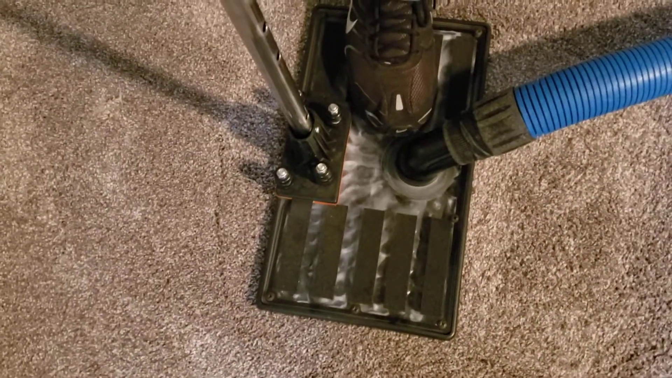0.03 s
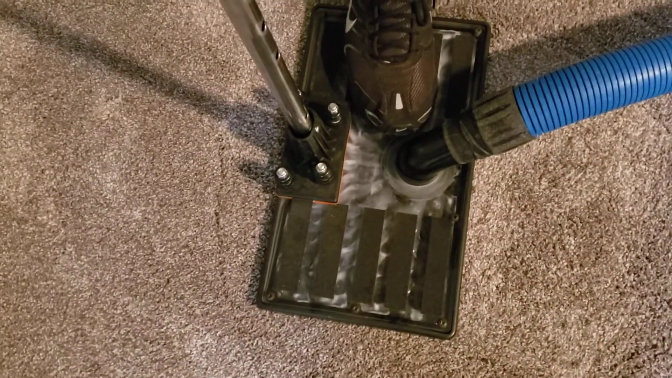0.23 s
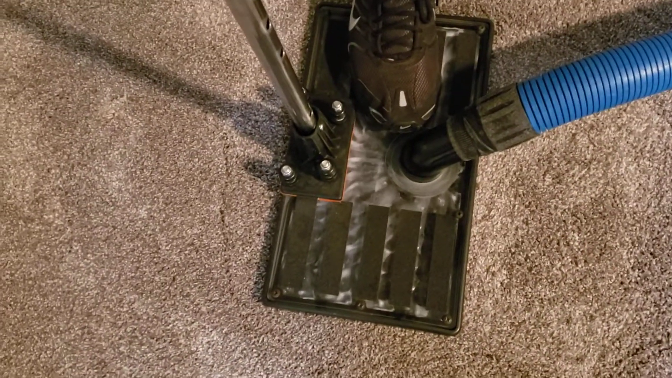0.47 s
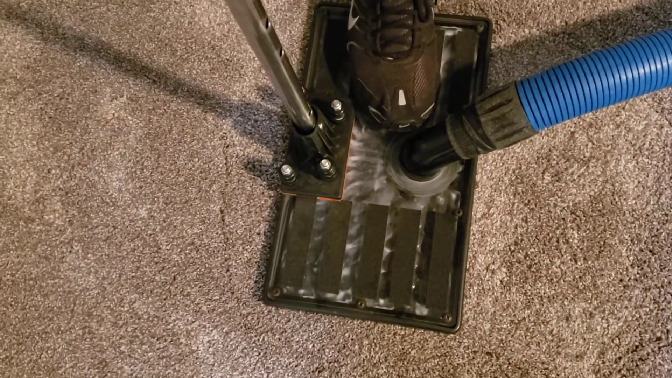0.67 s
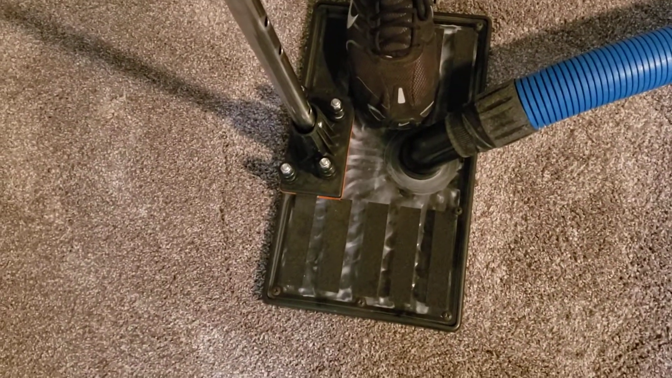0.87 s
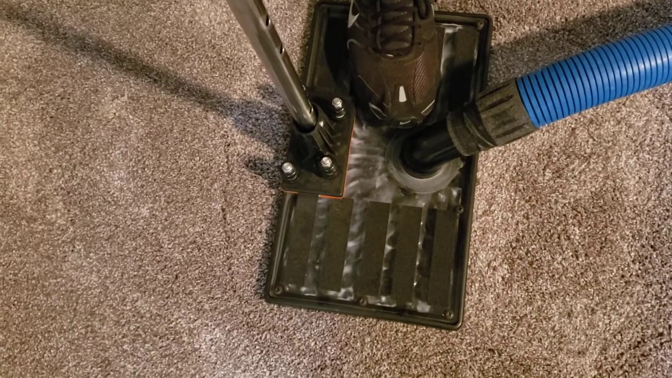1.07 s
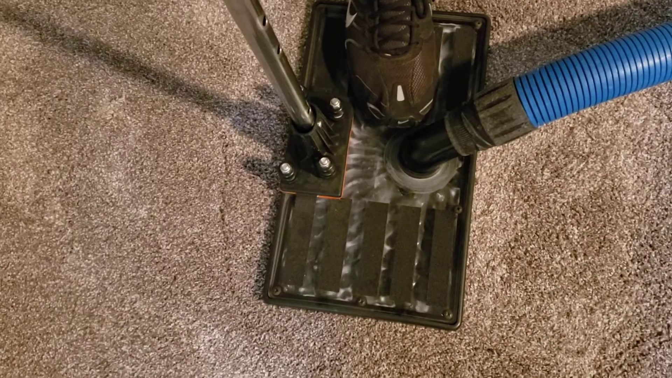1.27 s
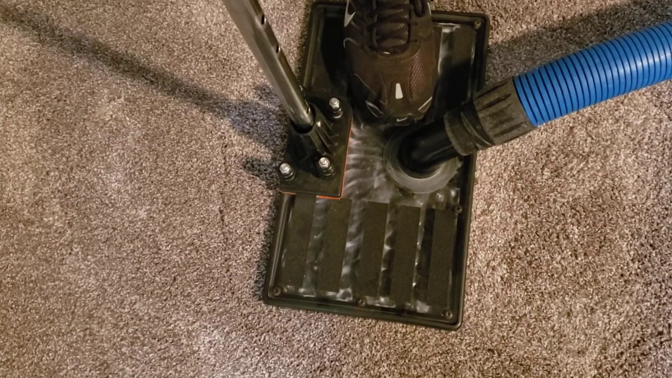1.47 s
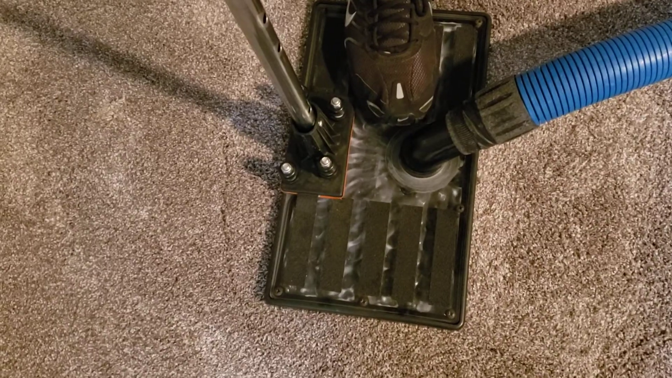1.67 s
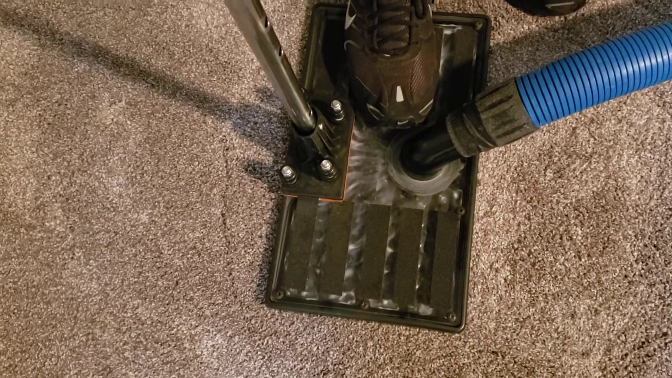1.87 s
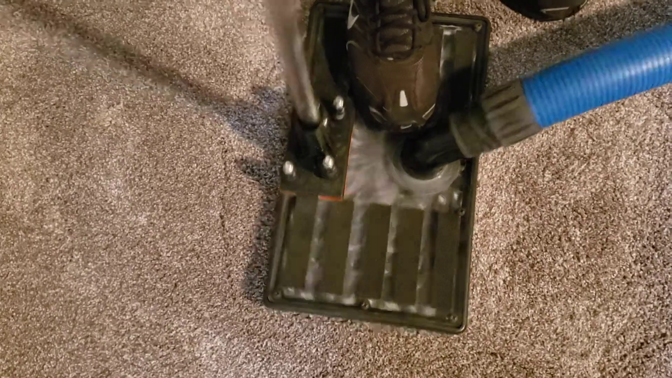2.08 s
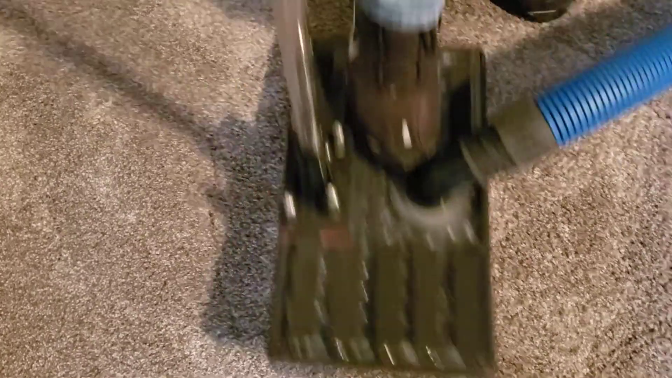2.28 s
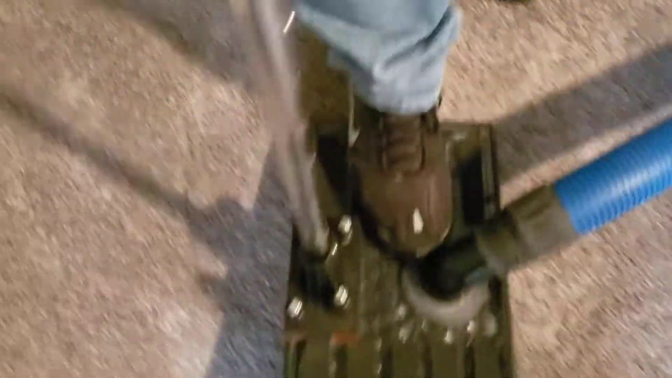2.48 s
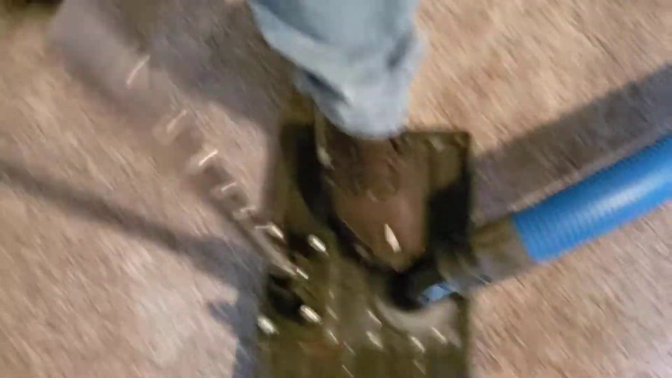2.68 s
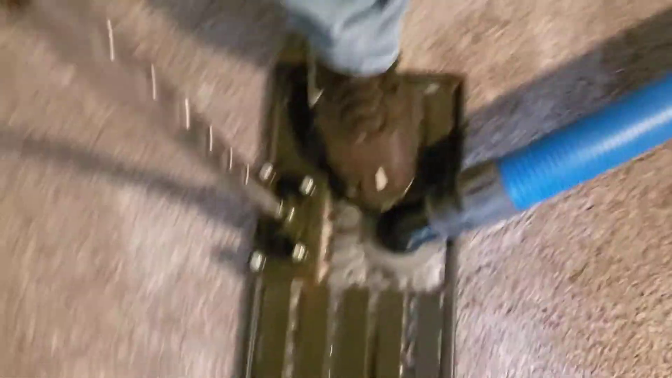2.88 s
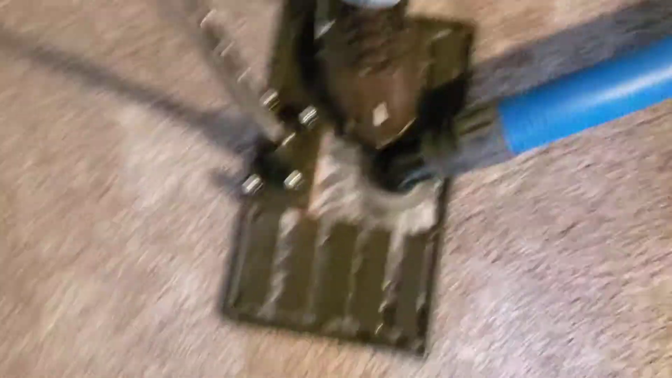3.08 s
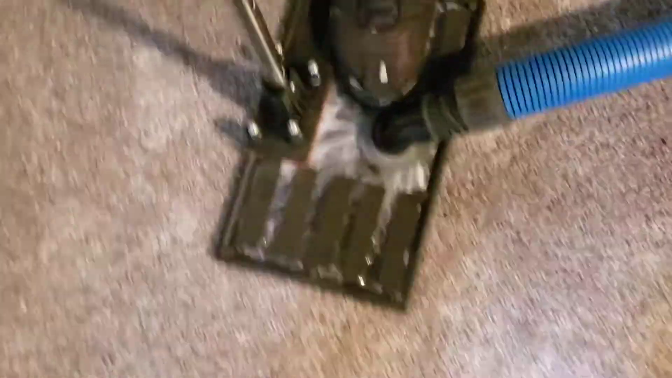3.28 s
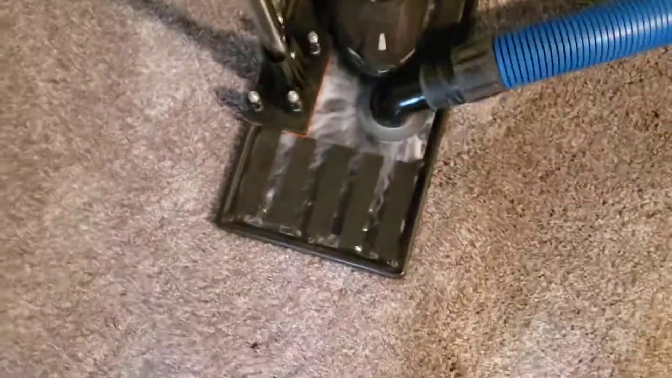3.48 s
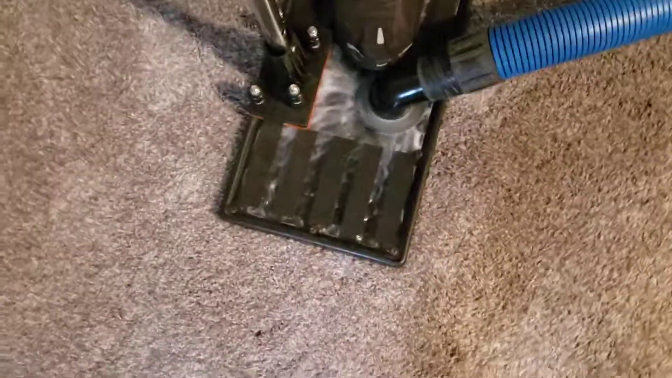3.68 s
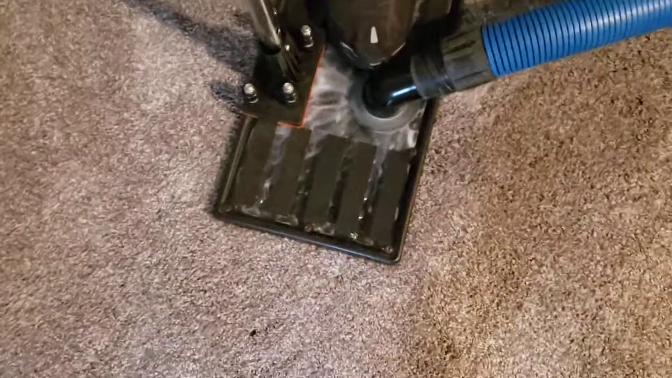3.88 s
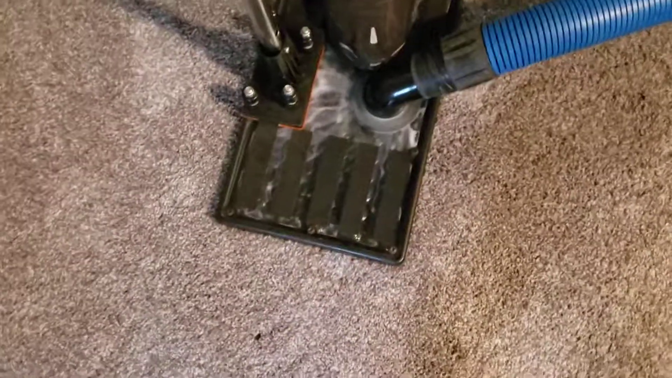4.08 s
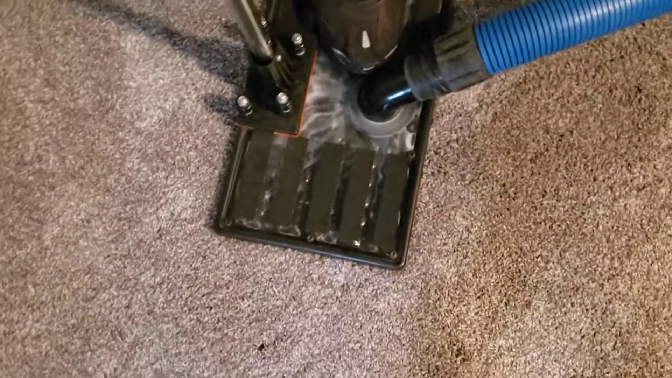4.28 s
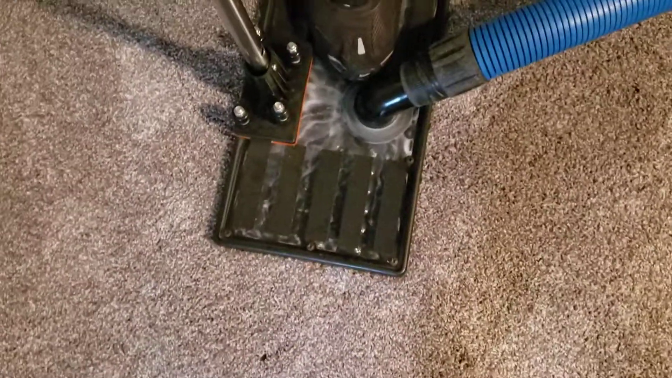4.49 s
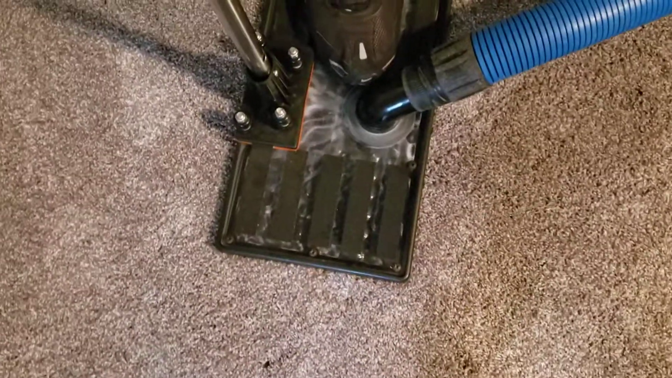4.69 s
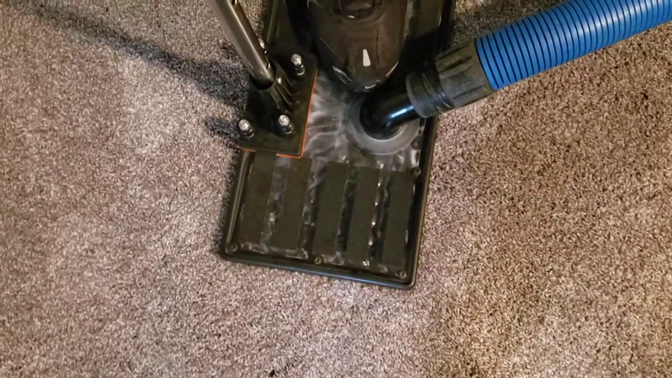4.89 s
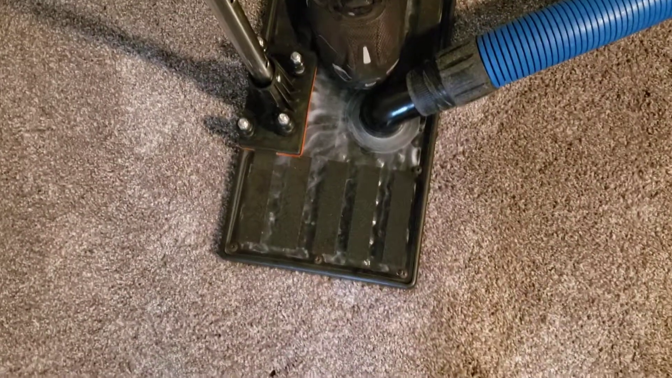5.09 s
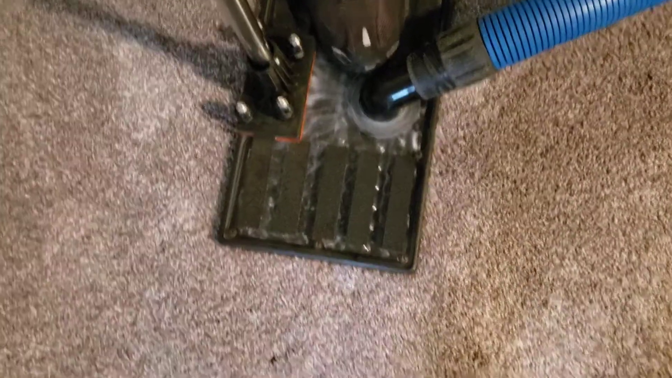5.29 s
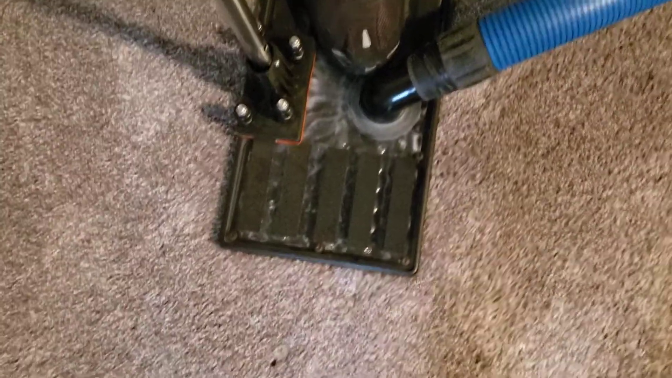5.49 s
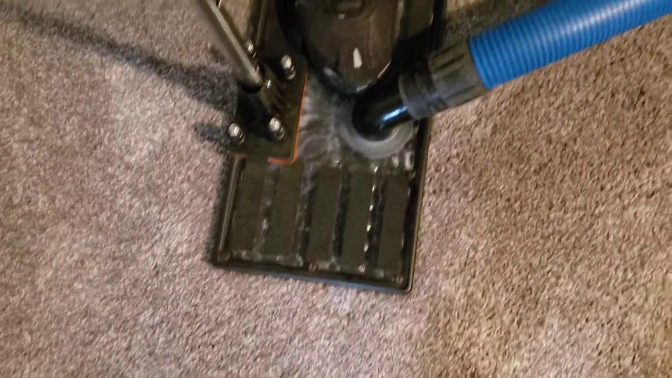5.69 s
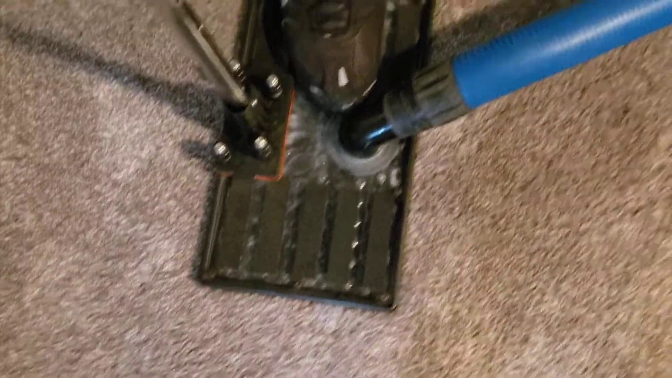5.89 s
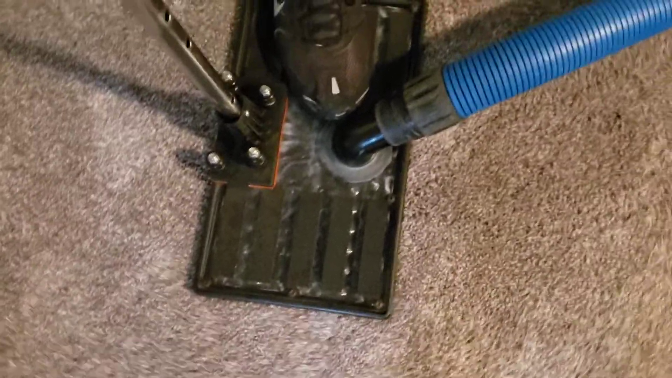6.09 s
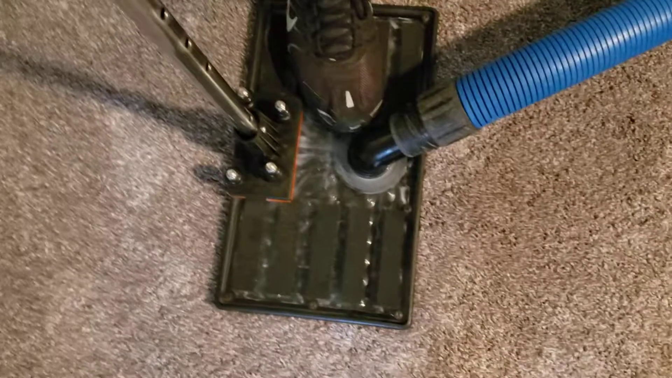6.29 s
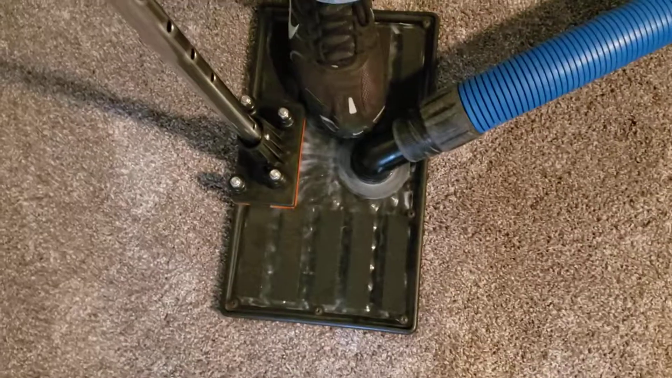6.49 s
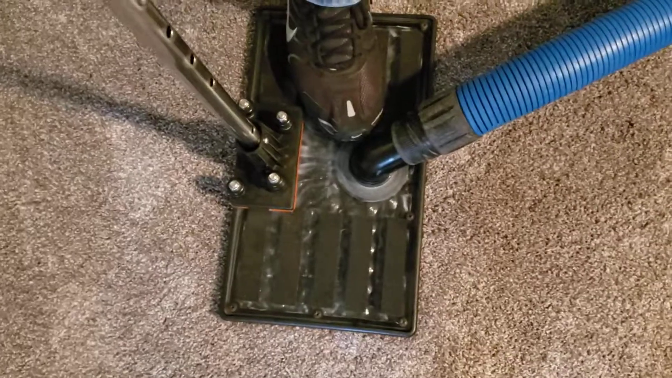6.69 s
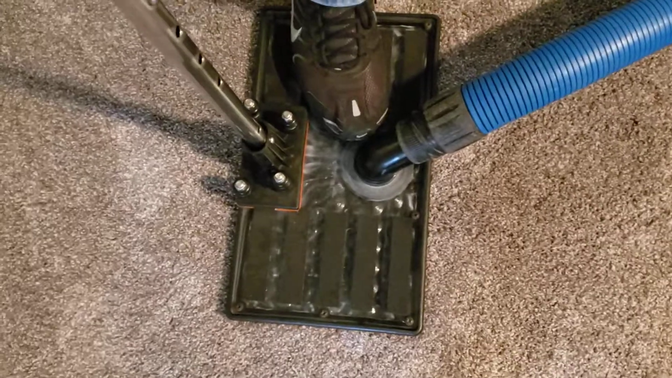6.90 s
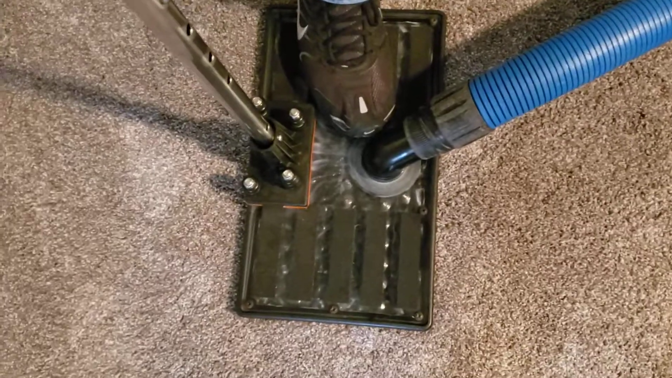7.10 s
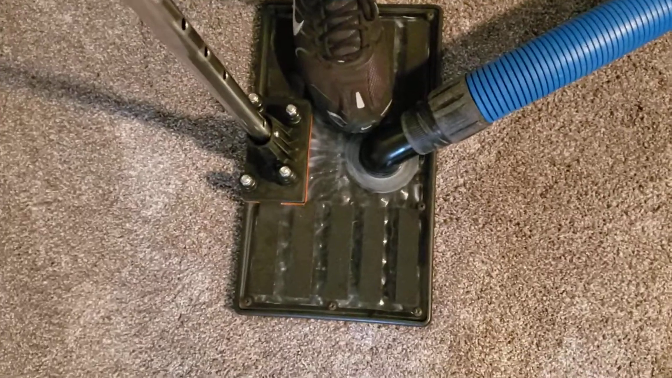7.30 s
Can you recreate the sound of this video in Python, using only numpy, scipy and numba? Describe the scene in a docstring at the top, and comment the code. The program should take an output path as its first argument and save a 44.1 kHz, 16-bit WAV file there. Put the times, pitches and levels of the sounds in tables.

```python
"""A flat suction plate pulls water out of a carpet while its vacuum machine hums further off in the house.
Air hisses and spits through the wet pile under the rim, and water gurgles up the hose. At two seconds a
foot shoves the plate forward: it scrubs over the pile, thumps the floor and squirts water through the gap.
The hiss falls back, then builds again as the plate seals; slugs of water briefly choke it near six seconds."""
import sys
import numpy as np
from scipy import signal
from scipy.fft import rfft, irfft
from scipy.io import wavfile
from numba import njit

SR = 44100
rng = np.random.default_rng(int(sys.argv[2]) if len(sys.argv) > 2 else 0)


def unload_audio(sound):
    """Save the sound as a 16-bit wav file, at the path given as the first command line argument."""
    columns = np.transpose(np.atleast_2d(sound))
    # keep every value between -1 and 1, then stretch to whole-number steps
    steps = np.round(np.clip(columns, -1, 1) * 32767)
    wavfile.write(sys.argv[1], SR, steps.astype(np.int16))


N = 323694
TIME = np.arange(N) / SR
BIN_HZ = np.maximum(np.arange(N // 2 + 1) * SR / N, 1)

# How strongly air is drawn through the carpet: time_s, level_db
SUCTION = [(0.0, -41), (0.43, -37), (2.11, -36.5), (2.15, -30.5), (2.17, -35), (2.62, -34.5), (2.82, -42.5),
           (3.9, -45), (5.01, -40), (5.68, -35.5), (6.01, -36.5), (7.34, -36.5)]
# Tone colour of the hiss in the pile before, during and after the shove: pitch_hz, relative_db
PILE_BEFORE = [(180, -51), (300, -21), (444, -23), (516, -7.5), (741, -26.5), (836, -14.5), (1060, -27),
               (1670, -8), (1860, -15), (2000, -11.5), (2670, -7.5), (3060, -9), (3610, -5.5), (8510, -5),
               (11000, -4), (14300, -32), (22000, -120)]
PILE_SLIDING = [(300, -23), (1000, -44), (2000, -8.5), (3000, -8), (3600, -3), (4600, -2.5), (6000, -2.5),
                (7100, 3), (8400, 4.5), (9500, 4.5), (11000, -16), (14300, -24)]
PILE_AFTER = [(180, -54), (300, -17), (418, -14.5), (486, -27.5), (540, -11.5), (667, -23.5), (823, -12.5),
              (1080, -27), (1260, -18), (1890, -12), (2060, -13), (4320, -4.5), (7320, -3.5), (8140, -5.5),
              (11000, -4.5), (14300, -41), (22000, -120)]
# Notes that the air sounds in the hose: start_s, end_s, pitch_hz, width_hz, relative_db
HOSE_WHISTLES = [(0, 1.4, 3920, 500, -12), (1.7, 1.97, 4520, 400, -8), (2.35, 3.1, 3880, 450, -7.5),
                 (3.15, 7.34, 1900, 95, -18.5), (5.5, 7.34, 4830, 450, -14.5)]
# Tone colour of the air jets at the rim before, during and after the shove: pitch_hz, relative_db
JETS_BEFORE = [(7000, -28.5), (9000, -11), (10400, -5), (11000, -3), (11650, 3), (12500, 0.5), (14300, -2),
               (14900, -6), (15800, -11.5)]
JETS_SLIDING = [(7000, -29.5), (9000, -17), (9800, -1), (11300, 1), (12200, -1.5), (13300, -3),
                (14300, -11), (15800, -4)]
JETS_AFTER = [(7000, -32), (9000, -9), (10400, -4.5), (11000, -1.5), (11650, 3), (13200, 0.5), (14300, 0),
              (14900, -5), (15800, -5.5)]
# Tone colour of water sputtering in the hose: pitch_hz, relative_db
GURGLE_COLOUR = [(300, -14), (420, 2.5), (540, -3), (720, 0), (880, 0), (1150, -5), (1700, 2.5), (2600, -5),
                 (4000, -14)]
# The blower's note, which shows the machine's speed: time_s, pitch_hz
BLOWER_PITCH = [(0.0, 265), (0.12, 264.8), (2.37, 266.0), (2.45, 269.7), (3.29, 270.1), (3.95, 263.2),
                (7.34, 266.6)]
# How loud that note is: time_s, relative_db
BLOWER_LEVEL = [(0.0, -69), (0.61, -54.5), (0.94, -67), (1.14, -56.5), (1.53, -70), (1.71, -52.5),
                (3.11, -61), (4.07, -70), (4.52, -57), (4.68, -64.5), (6.19, -53), (6.64, -59), (6.75, -54),
                (7.34, -60.5)]
# Hum at 1, 2 and 3 times the motor's turning rate:
# sealed_level_db, db_per_suction_db, sliding_change_db, waver_db, left_minus_right_db
MOTOR_TONES = [(-49.5, 1.45, -13, 1.0, 3), (-56, 1.1, 0, 2, 3), (-52.5, 1.3, -1.5, 1.0, 3)]
# Tone colour of the rumbling hose: pitch_hz, relative_db
RUMBLE_COLOUR = [(20, -30), (30, -19), (39, -2), (52, -10), (68, -9), (78, 0), (100, -7), (126, 2.5),
                 (160, -12.5), (215, -3), (280, -13.5), (340, -11.5), (520, -24.5)]
# Tone colour of the plate rubbing on the pile: pitch_hz, relative_db
RUBBING_COLOUR = [(60, -25), (130, 0), (300, -3.5), (800, -1.5), (1250, 0.5), (1800, -7.5), (3000, -10),
                  (6000, -21)]
# The plate jerks loose and settles; weight on it boosts the lowest floor note: time_s, force_db, weight_db
JERKS = [(2.064, -32, -6), (2.13, -40, 0), (2.207, -39, 0), (2.781, -36, 4), (2.843, -44, 9)]
# Notes of the padded floor: pitch_hz, relative_db, ring_s (time to fade by 60 dB)
FLOOR_NOTES = [(43, -9, .28), (79, 4.5, 0.11), (128, 1.5, 0.079), (209, -1, 0.074)]
# Tone colour of the puff of air under a thump: pitch_hz, relative_db
PUFF_COLOUR = [(30, -20), (100, 9), (200, -20), (650, -6.5), (2000, -31)]
# Water squirts through the gap, each at its peak: time_s, level_db, pitch_hz, glide_hz_per_s
SQUIRTS = [(2.16, -23, 13200, -4000), (2.205, -13.5, 11720, -5000), (2.61, -29, 9600, -2000),
           (2.81, -21.5, 11400, 4000), (2.853, -21, 13200, 8000)]
# Slugs of water block the flow: time_s, depth_db
CHOKES = [(5.8, 9), (5.96, 5), (6.055, 10)]
# How alike the two sides sound: pitch_hz, likeness (0 is unrelated, higher is more alike)
STEREO_LIKENESS = [(60, 1.5), (140, .95), (290, 0.8), (480, 0.75), (800, 0.6), (1150, -0.15), (1600, 0.5),
                   (2200, .55), (3100, 0), (4200, 0.27), (4900, -0.1), (5600, 0.11), (12000, 0.07),
                   (15000, 0)]
# Which side is louder: pitch_hz, left_minus_right_db
STEREO_BALANCE = [(110, -0.5), (340, 0), (560, 2.5), (800, 0), (1700, 1.5), (2500, 0.5), (3550, -6),
                  (4600, 0), (8300, -3), (10700, 2), (13300, 1.5), (14500, 7), (15800, 1)]

PUSH_S, STOP_S = 2.14, 2.765   # the plate slides between these moments
SEALED_DB = -35   # suction with the plate well sealed


def from_db(db):
    """Turn decibels into a number to multiply a sound by."""
    return 10 ** (np.asarray(db) / 20)


def rms_one(x):
    """Scale a sound so that the average of its sides has a typical size (rms) of 1."""
    return x / np.sqrt(np.mean(np.atleast_2d(x).mean(axis=0) ** 2) + 1e-20)


def over_time(table):
    """Join a table's points with straight lines, giving a value for every sample."""
    return np.interp(TIME, *np.transpose(table))


def over_pitch(table):
    """Join a table's points along a scale of octaves, giving a value for every frequency."""
    hz, value = np.transpose(table)
    return np.interp(np.log(BIN_HZ), np.log(hz), value)


def held(start, end, rise_s, fall_s):
    """A volume shape that rises to 1 by start and falls away after end."""
    return np.clip(np.minimum((TIME - start) / rise_s, (end - TIME) / fall_s) + 1, 0, 1)


def bump(time_s, width_s):
    """A brief bell-shaped swell of height 1."""
    return np.exp(-((TIME - time_s) / width_s) ** 2)


def drift(rate_hz):
    """A smooth random wobble of typical size 1 that changes about rate_hz times a second."""
    return rms_one(irfft(rfft(rng.standard_normal(N)) / (1 + (BIN_HZ / rate_hz) ** 2), N))


def flutter(rate_hz, depth_db):
    """A randomly wavering volume that keeps the average power."""
    return rms_one(from_db(depth_db * drift(rate_hz)))


def panned(x, left_db):
    """Make the left side left_db louder than the right."""
    return x * from_db(np.array([[.5], [-.5]]) * left_db)


def noise(colour):
    """A stereo rushing sound, shaped by rows of pitch_hz, relative_db."""
    middle, side = rfft(rng.standard_normal((2, N)))
    alike = np.clip(over_pitch(STEREO_LIKENESS), -.6, .99)
    pair = middle + np.sqrt((1 - alike) / (1 + alike)) * side * [[1], [-1]]
    pair = panned(pair, over_pitch(STEREO_BALANCE))
    return rms_one(irfft(pair * from_db(over_pitch(colour)), N))


@njit
def resonate(x, hz, width_hz):
    """Make a sound ring around a pitch that can move, as it does in a hollow space."""
    y, decay = np.zeros_like(x), np.exp(-np.pi * width_hz / SR)
    for side in range(2):
        ring = 0j
        for i in range(N):
            ring = ring * decay * np.exp(2j * np.pi * hz[i] / SR) + x[side, i]
            y[side, i] = ring.real
    return y * np.sqrt(2 * (1 - decay * decay))


def pull_db():
    """How far the suction is above or below that of the well sealed plate."""
    return over_time(SUCTION) - SEALED_DB


def changing_hiss(before, sliding, after):
    """The hiss changes colour as the plate leaves one patch of carpet and settles on the next."""
    gone = np.clip(.5 + (TIME - PUSH_S) / 0.14, 0, 1)
    landed = np.clip(.5 + (TIME - STOP_S) / 0.1, 0, 1)
    return (np.sqrt(1 - gone) * noise(before)
            + np.sqrt(gone * (1 - landed)) * noise(sliding)
            + np.sqrt(landed) * noise(after))


def pile_hiss():
    """Air rushes through the wet pile and whistles in the hose; water slurps in the plate's throat."""
    hiss = from_db(4) * changing_hiss(PILE_BEFORE, PILE_SLIDING, PILE_AFTER)
    flow = noise([(800, -25), (1600, -6), (5200, -8), (8000, -22)])
    for start, end, hz, width_hz, whistle_db in HOSE_WHISTLES:
        whistle = rms_one(resonate(flow, np.full(N, float(hz)), float(width_hz)))
        hiss += from_db(whistle_db) * held(start, end, rise_s=.23, fall_s=.23) * whistle
    slurp_hz = 2890 * 2 ** (.35 * drift(rate_hz=4.2))   # wanders by about a third of an octave
    slurp = from_db(-16.5) * rms_one(resonate(flow, slurp_hz, width_hz=300.0))
    slurp *= flutter(rate_hz=7, depth_db=2)
    return from_db(over_time(SUCTION)) * (hiss + slurp) * flutter(rate_hz=125, depth_db=0.92)


def rim_jets():
    """Thin jets of air hiss very high at the rim; spitting droplets roughen them and the squirts."""
    sliding = held(PUSH_S, STOP_S, rise_s=.03, fall_s=.08)
    level_db = -23.5 + 1.03 * pull_db() + 2 * sliding
    jets = from_db(level_db) * changing_hiss(JETS_BEFORE, JETS_SLIDING, JETS_AFTER)
    spit = flutter(rate_hz=160, depth_db=0.2) * flutter(rate_hz=47, depth_db=0.82)
    return spit * (jets + squirts())


def echoes(x, echo_db, sway_s, count=8):
    """Short echoes bounce off tool, legs and walls; their delays shift as the listening point sways."""
    out, sway = x.copy(), drift(rate_hz=0.57)
    for late, lean, flip in rng.random((count, 3)):
        delay_s = .001 + .009 * late + sway_s * (2 * lean - 1) * sway
        for side in range(2):
            arrival_s = delay_s + rng.uniform(0, .0002)
            echo = np.interp(TIME - arrival_s, TIME, x[side], left=0)
            out[side] += np.sign(flip - .5) * from_db(echo_db) * echo
    return out / np.sqrt(1 + count * from_db(2 * echo_db))


def gurgle():
    """Water sputters up the hose in uneven slugs, harder when the suction is strong."""
    slugs = flutter(rate_hz=9, depth_db=3.2) * flutter(rate_hz=170, depth_db=4.2)
    return from_db(over_time(SUCTION) - 16) * slugs * noise(GURGLE_COLOUR)


def hum(hz, level_db, waver_db, left_db):
    """One pure note of the machine, wavering in strength."""
    wave = np.sqrt(2) * np.sin(2 * np.pi * (np.cumsum(hz) / SR + rng.random()))
    return panned(from_db(level_db) * wave * flutter(rate_hz=2.3, depth_db=waver_db), left_db)


def machine():
    """The blower sings, the motor hums and the hose rumbles; the last two grow with the suction."""
    blower_hz = over_time(BLOWER_PITCH)
    motor_hz = 62.86 * (blower_hz / 266) ** 0.68   # shares part of the blower's changes of speed
    pull = pull_db()
    sliding = held(PUSH_S + .1, STOP_S - .1, rise_s=.12, fall_s=.12)
    loss_db = np.interp(TIME, [PUSH_S, STOP_S], [0, 3])   # the two lowest hums weaken on the new patch
    out = hum(blower_hz, over_time(BLOWER_LEVEL) - 1, waver_db=0.9, left_db=-12)
    for multiple, (sealed_db, follows, sliding_db, waver_db, left_db) in enumerate(MOTOR_TONES, 1):
        level_db = sealed_db + follows * pull + sliding_db * sliding - loss_db * (multiple < 3)
        out += hum(multiple * motor_hz, level_db, waver_db, left_db)
    return out + from_db(-49 + 1.14 * pull) * noise(RUMBLE_COLOUR)


def scrub():
    """Tufts slip under the sliding rim and sound the hollow under the plate, whose pitch sinks."""
    sliding = held(PUSH_S, STOP_S, rise_s=.13, fall_s=.071) ** 1.5
    enclosed = held(PUSH_S + .03, STOP_S - .1, rise_s=.05, fall_s=.16)
    pushed_s = np.clip(TIME, PUSH_S, STOP_S) - PUSH_S
    hollow_hz = 670 * 2 ** (-1.87 * pushed_s)   # sinks 1.87 octaves a second
    slips = flutter(rate_hz=110, depth_db=1.1)
    tufts = noise([(120, -40), (280, 1), (750, 1.0), (1300, -29), (3000, -40)]) * slips
    hollow = enclosed * rms_one(resonate(tufts, hollow_hz, width_hz=230.0))
    breakaway_db = 5 * bump(PUSH_S, width_s=.02)
    braking_db = 2 * bump(STOP_S - .034, width_s=.034)
    rubbing = from_db(-2.1 + breakaway_db + braking_db) * noise(RUBBING_COLOUR) * slips
    return panned(from_db(-38) * sliding * (hollow + rubbing), left_db=0.3)


def thumps():
    """Each jerk of the plate rings the padded floor and squeezes out a dull puff."""
    rise_s, puff_fade_s = 0.0036, 0.027
    floor, puff = np.zeros(N), np.zeros(N)
    for time_s, force_db, weight_db in JERKS:
        age = np.maximum(TIME - time_s, 0)
        force = from_db(force_db) * (1 - np.exp(-age / rise_s))
        puff += force * np.exp(-age / puff_fade_s)
        for note, (hz, note_db, ring_s) in enumerate(FLOOR_NOTES):
            ring_db = note_db + weight_db * (note == 0) - 60 * age / ring_s
            floor += force * from_db(ring_db) * np.sin(2 * np.pi * hz * age)
    return floor + from_db(-4) * puff * noise(PUFF_COLOUR)


def squirts():
    """Each squirt swells fast and dies away; its sizzle glides in pitch as the gap opens or closes."""
    rise_s, fall_s, glide_s = 0.047, 0.072, 0.057
    out, spray = np.zeros((2, N)), noise([(6500, -46), (9500, -2.0), (14000, 4), (15500, -20)])
    for time_s, level_db, hz, hz_per_s in SQUIRTS:
        age = TIME - time_s
        swell = np.where(age < 0, bump(time_s, rise_s), np.exp(-np.abs(age) / fall_s))
        sizzle_hz = hz + hz_per_s * glide_s * np.tanh(age / glide_s)
        out += from_db(level_db) * swell * rms_one(resonate(spray, sizzle_hz, width_hz=730.0))
    return out


def choked(rush, below_hz=1800):
    """The low part of the rush dips whenever a slug of water blocks the way."""
    low = irfft(rfft(rush) / (1 + (BIN_HZ / below_hz) ** 2), N)
    dip_db = sum(depth_db * bump(time_s, width_s=.028) for time_s, depth_db in CHOKES)
    return rush + (from_db(-dip_db) - 1) * low


def scene():
    """The plate close by, the machine behind; the sliding rim sprays its hiss a little to the left."""
    left_db = 0.44 + 1.9 * held(PUSH_S, STOP_S, rise_s=.1, fall_s=.11)
    hiss = echoes(pile_hiss() + panned(rim_jets(), left_db), echo_db=-18, sway_s=0.00013)
    return choked(hiss + gurgle()) + scrub() + thumps() + machine()


def record(dry):
    """The microphone drops the deepest bass, flattens any overloud peak and cuts the highest treble."""
    lowest_hz, highest_hz = 30, 15880
    thinned = signal.sosfilt(signal.butter(3, lowest_hz, "high", fs=SR, output="sos"), dry)
    clipped = np.clip(thinned, -.92, .92)
    return irfft(rfft(clipped) / np.sqrt(1 + (BIN_HZ / highest_hz) ** 900), N)


dry = scene()
out = record(dry)
unload_audio(out)
```